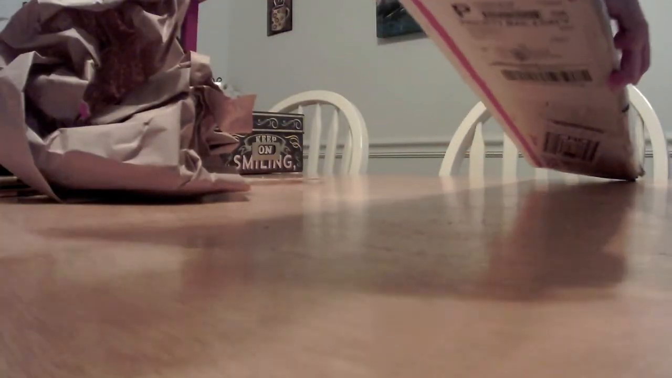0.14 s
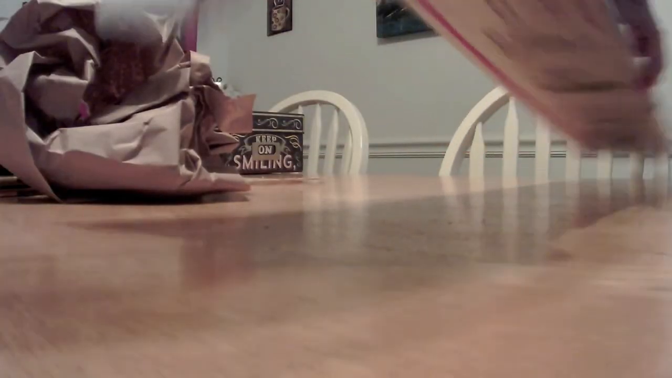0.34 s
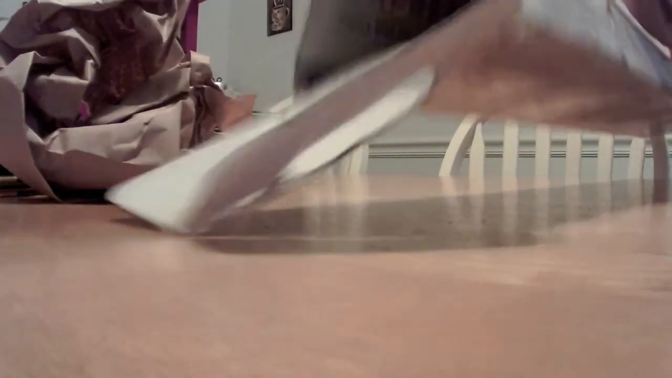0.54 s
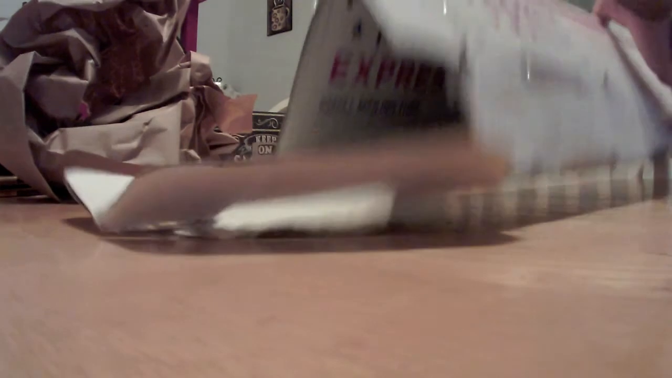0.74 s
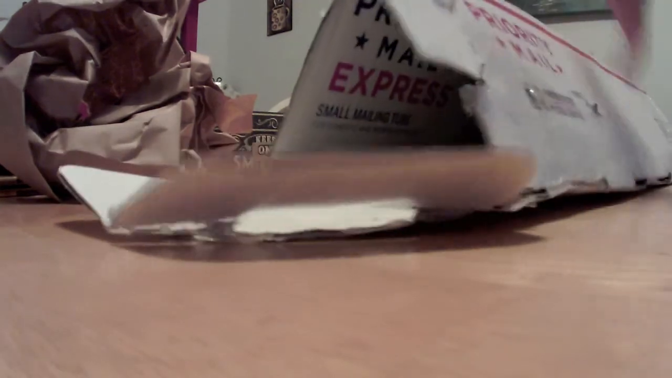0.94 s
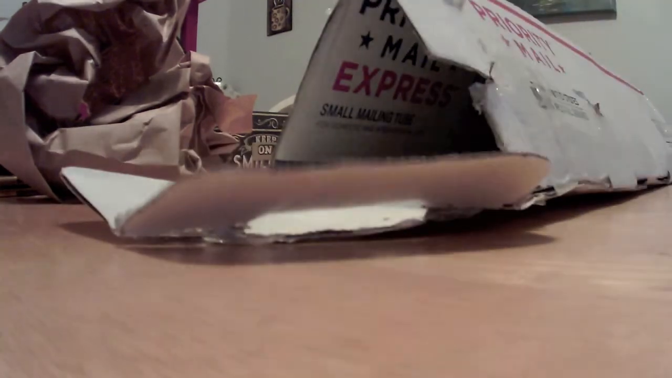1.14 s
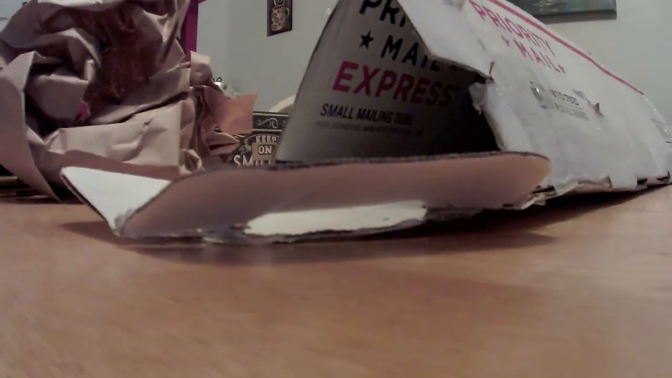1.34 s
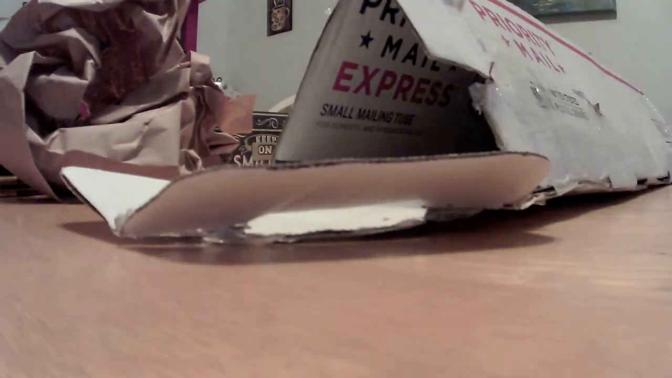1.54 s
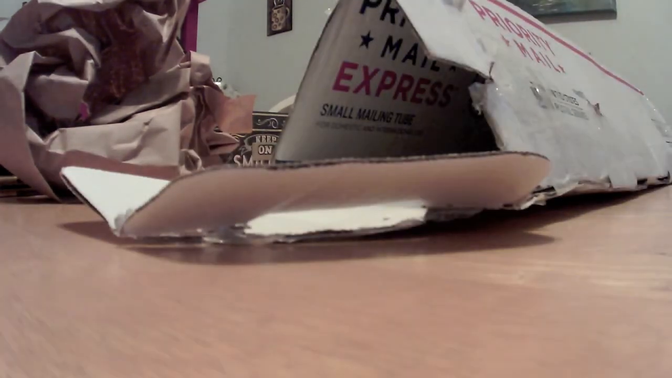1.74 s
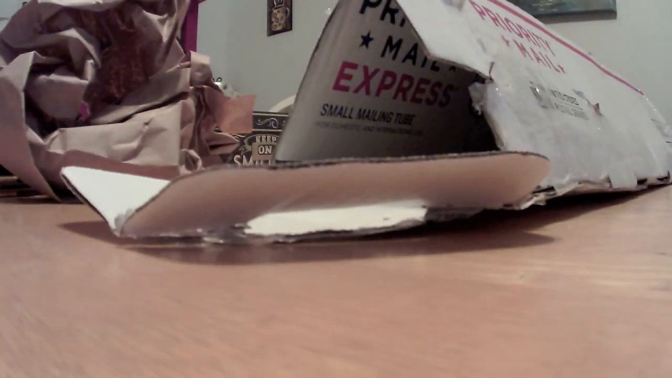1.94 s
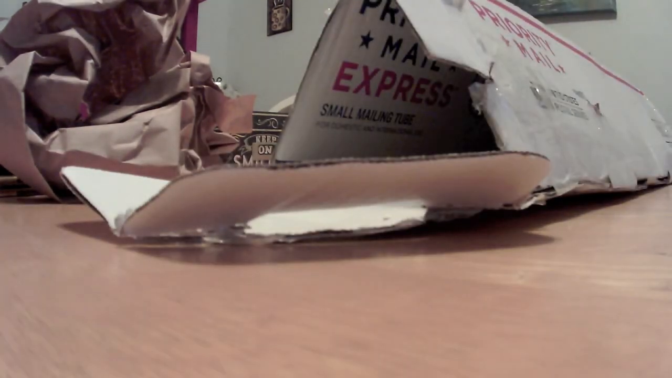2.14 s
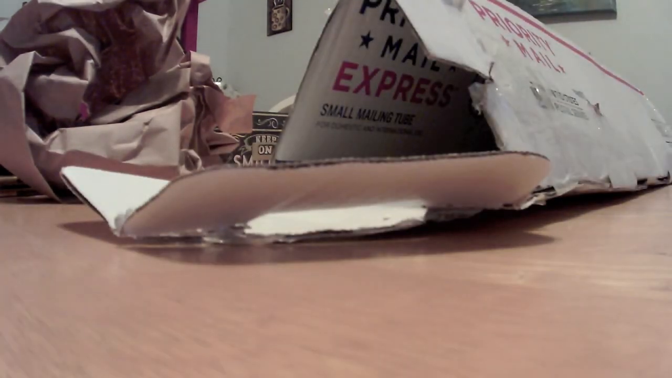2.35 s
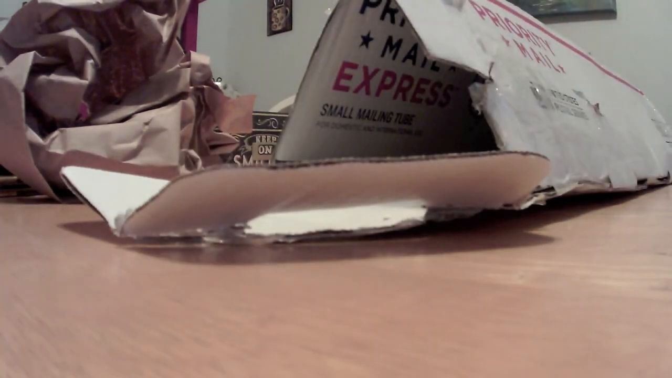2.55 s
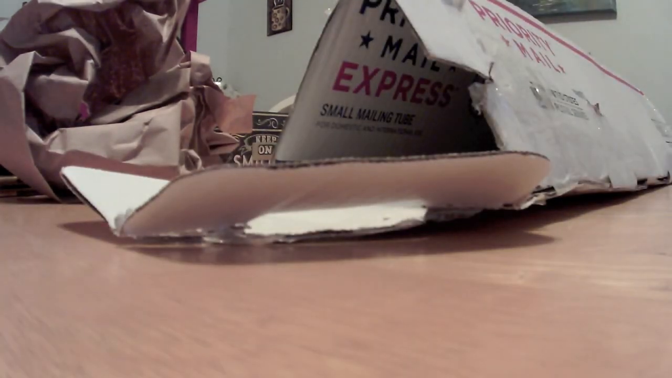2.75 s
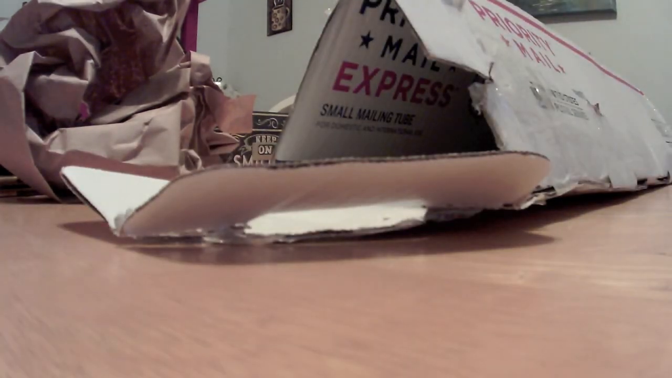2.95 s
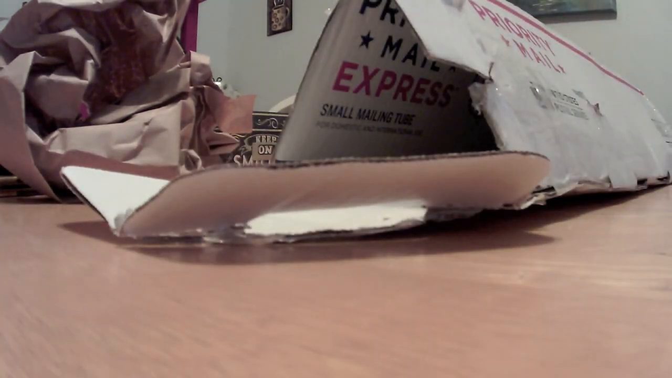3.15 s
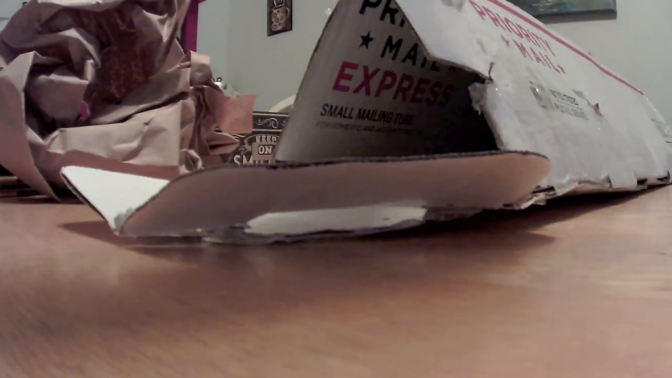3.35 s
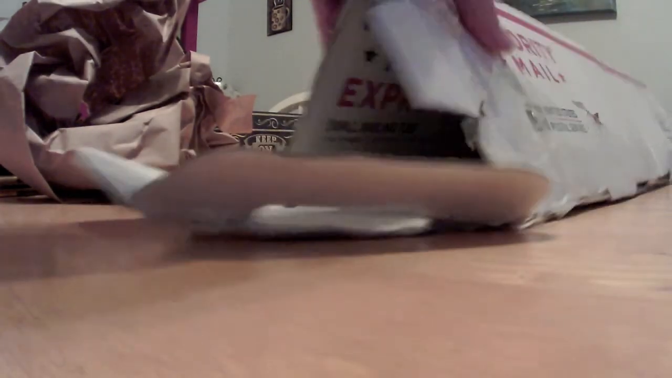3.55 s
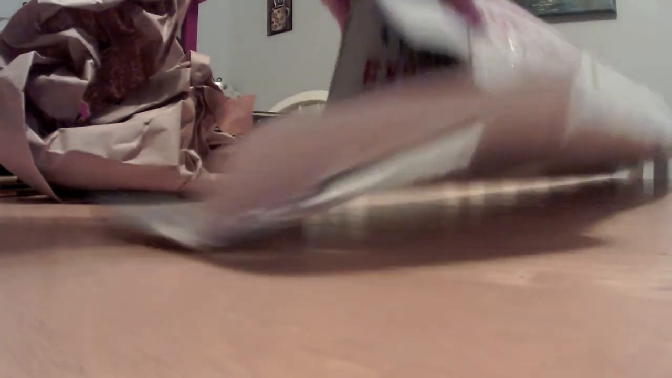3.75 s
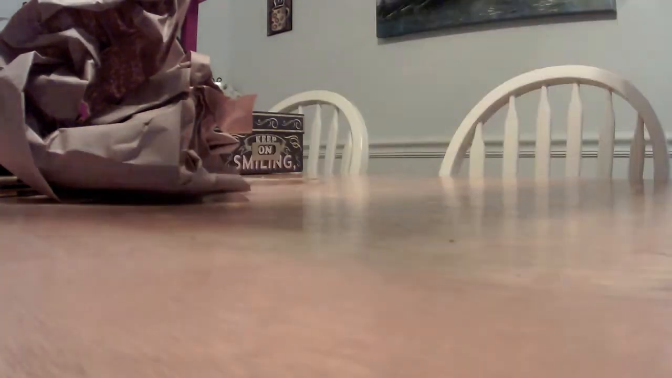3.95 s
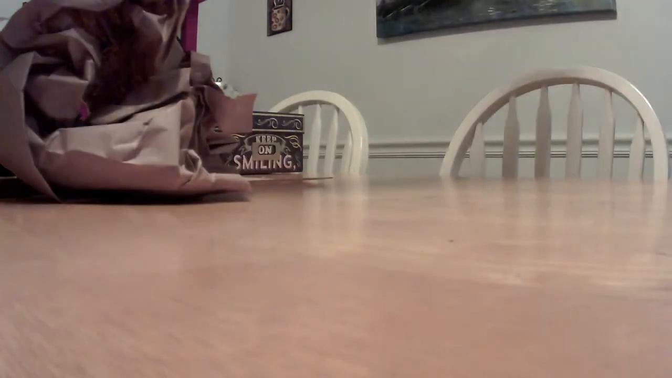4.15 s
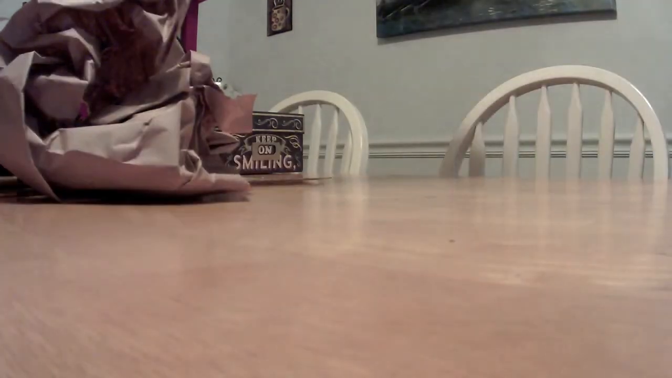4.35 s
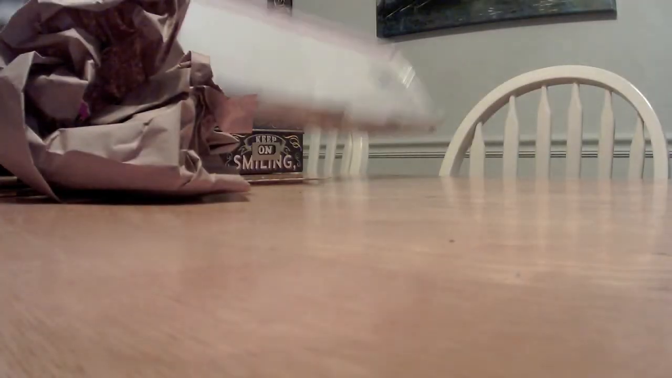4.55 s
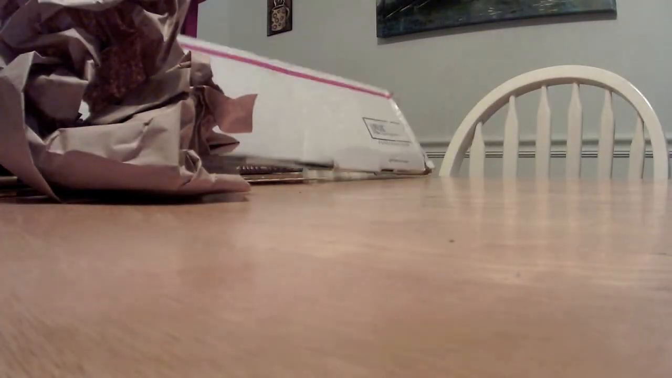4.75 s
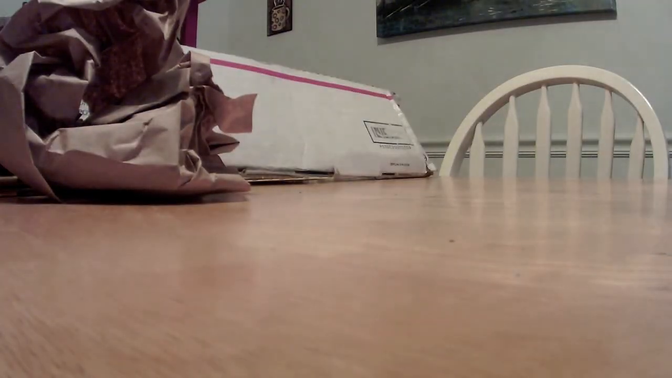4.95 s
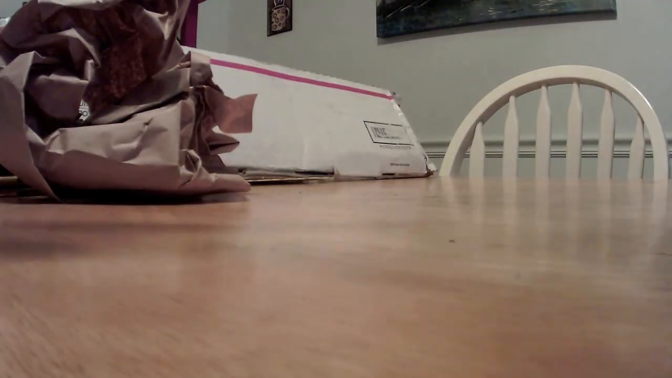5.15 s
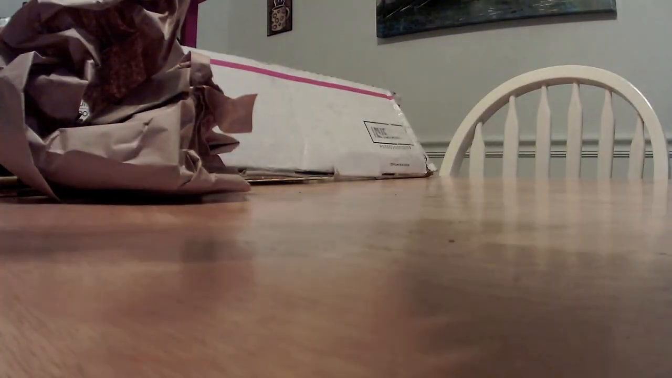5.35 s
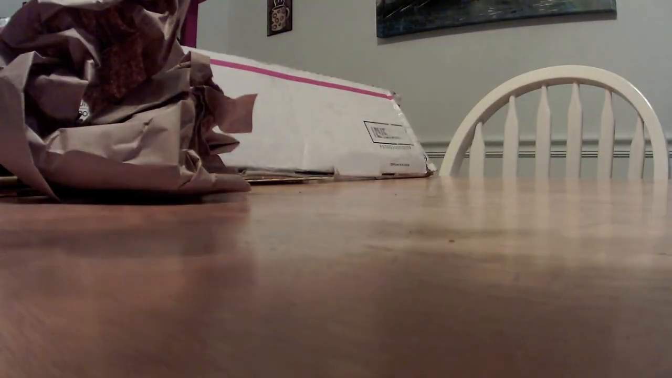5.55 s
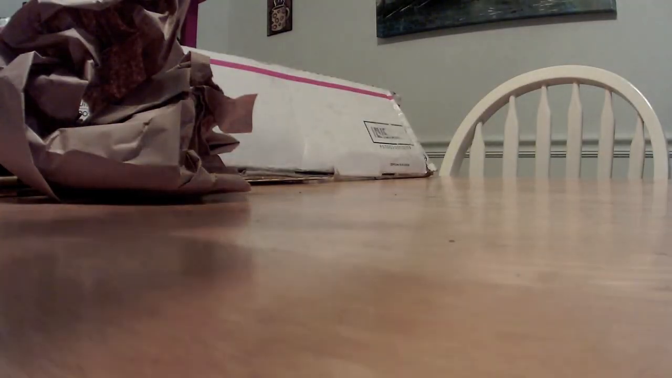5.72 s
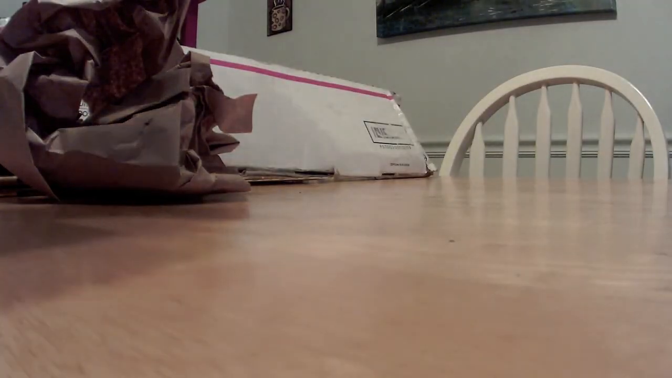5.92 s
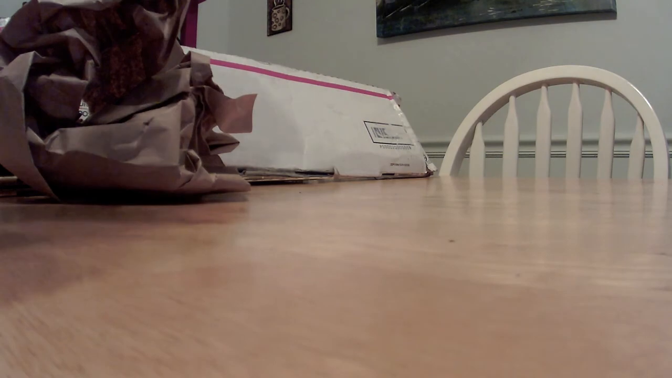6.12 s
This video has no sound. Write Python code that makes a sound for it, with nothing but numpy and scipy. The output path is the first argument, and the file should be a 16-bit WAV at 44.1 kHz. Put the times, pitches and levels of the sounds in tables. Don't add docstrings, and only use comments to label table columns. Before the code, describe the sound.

A small, narrow-band microphone lies on a wooden table in a quiet room with faint rumble and hiss. From 0 to 0.7 seconds, stiff paper crackles and snaps while a hollow cardboard box scrapes and ticks, strongest near 0.47. At about 0.95 the box lands with a loud hollow knock; its air rings on faintly and the table trembles low. From 1.5 to 2.1 paper crinkles in uneven swells, then again sharply around 2.5 to 2.7, with a deep table thump at 2.6. It is nearly quiet until 3.5, save tiny ticks. Between 3.65 and 3.95 the box is lifted with scrapes and hollow clacks. After another hush, it is set down from 4.75 to 4.95 with thuds and knocks. Paper crumples briskly from 5.4 to 5.8, fades, and one small high click comes near 6.2.

```python
import sys
import numpy as np
from scipy import signal
from scipy.fft import rfft, irfft, next_fast_len
from scipy.io import wavfile
from scipy.ndimage import uniform_filter1d, minimum_filter1d

SR = 44100
rng = np.random.default_rng(int(sys.argv[2]) if len(sys.argv) > 2 else 0)


def materialize(psi):
    bounded = np.clip(np.atleast_2d(psi).T, -1, 1)
    quanta = np.round(bounded * 32767).astype(np.int16)
    wavfile.write(sys.argv[1], SR, quanta)


def convert_level_to_amplitude(level_db):
    exponent = np.asarray(level_db, float) / 20
    return 10 ** exponent


N = 276948

# (frequency [Hz], density [dB per Hz])
PAPER_SPECTRUM = [(300, -26.5), (540, -28), (1270, -8), (2000, -5), (2900, -.5), (4300, -4), (6000, 2),
                  (7300, -1.5), (9200, 1.5), (12000, -0.5)]
# (peak time [s], crackle level [dB], rise [s per 20 dB], fall [s per 20 dB],
# treble over the crackle [dB])
SQUEEZES = [(0.068, -38.5, 0.4, 0.5, 3.5), (0.33, -42.5, -0.9, .5, 3), (0.472, -32.5, .1, 0.1, 5.5),
            (0.571, -42.5, -0.2, -0.12, 1), (1.445, -60, -0.3, 2, 0), (1.512, -44.5, 0.0652, 0.42, 3),
            (1.685, -48.5, 0.1, 0.2, 0.5), (1.842, -38, 0.2, 0.16, 2.5), (1.99, -48, 0, 0.18, 0.5),
            (2.05, -51, 1, -0.13, -0.5), (2.4, -60, 3, 0, -3.5), (2.497, -38, 0.06, 0.1348, 2),
            (2.576, -36.5, -0.2, 0.1242, 0.5), (2.7, -47, .03, 0.12, 0), (2.718, -41, 0, 0.0943, -4),
            (2.78, -61.5, -0.7, 0.5, -8), (3.073, -66.5, 0.1, 0.4, -3), (3.735, -43, 0.13, 0.04, -2.5),
            (5.0, -56.5, 0.12, 0.18, -2), (5.416, -43, 0.01, 0.15, 2), (5.458, -37, -0.1, 0.11, 3),
            (5.611, -36.5, 0.17, 0.2, 6), (5.665, -37, 0.13, 0.12, 3.5), (5.719, -36.5, 0.19, -0.0031, -3),
            (5.87, -56.5, -0.2, 0.1, 0), (5.81, -53, 0.8, 0.08, -3), (5.929, -53, 0.24, 0.08, -5.5)]
# (peak time [s], scrape level [dB], rise [s per 20 dB],
# fall [s per 20 dB], treble over its skin [dB])
SHOVES = [(0.22, -43.5, 5, 0.4, 10.5), (0.42, -42.5, .5, 0.29, 15.5), (0.476, -32.5, 0.06, 0.0352, -1),
          (0.57, -41.5, 0.2, 0.02, 6.5), (0.679, -41.5, -0.23, 0, 7), (0.62, -61, 1, -0.4, 7),
          (0.829, -50, 0.06, 0.5, 10), (0.918, -42, 0.03, 0.18, 6.5), (0.958, -34.5, 0.0536, 0.06, 5),
          (1.03, -50, -0.2, 0.23, 4.5), (1.658, -63.5, -1.5, 1, 1), (2.4, -64, 0.5, 1, 2),
          (2.47, -47.5, -0.06, 0.3, 3), (2.89, -58, .02, .15, 3), (3.07, -56.5, 0.1, 0.12, 3),
          (3.555, -58, .04, .1, 3), (3.671, -40, 0.02, 0.15, 7), (3.734, -45, 0.07, 0.13, 11.5),
          (3.79, -49.5, 0.16, 0.21, 11.5), (3.858, -40, 0.04, 0.1029, 9), (3.939, -42, 0.07, 0.1, 4),
          (3.98, -61, 0.3, .33, 10), (4.68, -63.5, 0.1, -3, -4), (4.751, -42.5, 0.0267, 0.1339, 7.5),
          (4.858, -41.5, 0.0235, 0.13, 11.5), (4.92, -45, 0.06, 0.13, 8), (4.995, -52, 0.09, 0.1, 13),
          (5.03, -56.5, 0.13, 0.09, -3), (6.18, -59.5, 0.1, 0.5, 12)]
REST_DB = -75
TICK_S = .0013


def evened(x):
    return x / np.sqrt(np.mean(x ** 2) + 1e-20)


def read(points, hz):
    f, value = np.transpose(points)
    return np.interp(np.log(hz + 1), np.log(f + 1), value)


def coloured(x, points):
    n = x.shape[-1]
    size = next_fast_len(n)
    gain = convert_level_to_amplitude(read(points, np.fft.rfftfreq(size, 1 / SR)))
    return irfft(rfft(x, size) * gain, size)[..., :n]


def add(mix, time_s, sound):
    part = mix[round(time_s * SR):][:len(sound)]
    part += sound[:len(part)]


def ring(hz, t60_s, seconds):
    t = np.arange(round(seconds * SR)) / SR
    return np.sin(2 * np.pi * hz * t) * convert_level_to_amplitude(-60 * t / max(t60_s, .002))


def resonate(x, hz, width_hz):
    return signal.lfilter(*signal.iirpeak(hz, hz / width_hz, SR), x)


def effort(rows, over_db=0):
    t, rows = np.arange(0, N + 64, 64) / SR, np.array(rows)
    peak_s, db, rise, fall = rows[:, :4].T[..., None]
    before = (peak_s - t) / np.maximum(rise, .005)
    after = (t - peak_s) / np.maximum(fall, .005)
    away = np.where(t < peak_s, before, after)
    power = (convert_level_to_amplitude(db + over_db - 20 * away) ** 2).sum(0)
    return np.interp(np.arange(N) / SR, t, power)


def quiet():
    # (frequency [Hz], density [dB per Hz])
    floor_spectrum = [(15, -10.5), (40, -6), (63, -3.5), (87, -13), (183, -15.5), (300, -19.5), (700, -24),
                      (1500, -30), (4000, -30.5), (9500, -29.5)]
    return convert_level_to_amplitude(-57.5) * evened(coloured(rng.standard_normal(N), floor_spectrum))


def grains(per_s, spread_db, clump_db, rub_db):
    size = convert_level_to_amplitude(spread_db * np.minimum(rng.exponential(1, N), 3.1)) * (rng.random(N) < per_s / SR)
    clumps = evened(uniform_filter1d(uniform_filter1d(rng.standard_normal(N), size=200), size=200))
    burst = uniform_filter1d(size, size=20) * rng.standard_normal(N)
    slips = evened(burst) + convert_level_to_amplitude(rub_db) * rng.standard_normal(N)
    return evened(slips * convert_level_to_amplitude(clump_db * clumps))


def crackle():
    skin_db = -6.5
    firm_db, skin_growth = -40.5, 0.22
    broad, thin = (coloured(grains(per_s=900, spread_db=3.2, clump_db=1.5, rub_db=-1.5), PAPER_SPECTRUM)
                   for _ in range(2))
    thin = thin + 0.38 * broad
    firm = (effort(SHOVES, -firm_db) + 1e-9) ** skin_growth
    squeeze_treble_db = np.array(SQUEEZES)[:, -1:]
    shove_treble_db = skin_db + np.array(SHOVES)[:, -1:]
    rest = convert_level_to_amplitude(REST_DB) ** 2
    body = effort(SQUEEZES) + firm * effort(SHOVES, skin_db) + rest
    bright = effort(SQUEEZES, squeeze_treble_db) + firm * effort(SHOVES, shove_treble_db) + rest
    split = signal.butter(3, 4800, fs=SR, output="sos")
    treble = convert_level_to_amplitude(2.0) * np.sqrt(bright) * evened(thin - signal.sosfiltfilt(split, thin))
    return np.sqrt(body) * evened(signal.sosfiltfilt(split, broad)) + treble


def patchy(x):
    patch_db = 2
    hz, t, z = signal.stft(x, SR, nperseg=256)
    field = rng.standard_normal((len(t), len(hz))).T
    for _ in range(2):
        field = uniform_filter1d(uniform_filter1d(field, size=5, axis=0), size=10, axis=1)
    gain = convert_level_to_amplitude(patch_db * evened(field) - patch_db ** 2 / 9)
    return signal.istft(z * gain, SR, nperseg=256)[1][:N]


def scrape():
    # (frequency [Hz], width [Hz], level [dB])
    air_modes = [(970, 730, -18), (1150, 520, 5), (1490, 210, 8), (1680, 290, 6), (2070, 540, -10.5)]
    x = grains(per_s=900, spread_db=3., clump_db=2., rub_db=4)
    box = sum(convert_level_to_amplitude(db) * resonate(x, hz, width_hz) for hz, width_hz, db in air_modes)
    paper_in_box_db = -19
    power = effort(SHOVES) + effort(SQUEEZES, paper_in_box_db) + convert_level_to_amplitude(REST_DB + 3.5) ** 2
    return convert_level_to_amplitude(-0.6) * np.sqrt(power) * evened(box)


def strays():
    per_s, level_db, spread_db = 45, 9, 3
    middle_db, top_db, colour_db = 1, -5, 5
    count = round(per_s * N / SR) - 1
    a, b, c, d, place = np.c_[rng.standard_normal((count, 4)), rng.random(count)].T
    time_s = .01 + (np.arange(count) + place) / per_s
    squeeze_db = 10 * np.log10(effort(SQUEEZES)[(time_s * SR).astype(int)] + 1e-12)
    db = squeeze_db + level_db + spread_db * np.minimum(a, 1)
    length_s = TICK_S * np.exp(.5 * d)
    return np.c_[time_s, db, middle_db + colour_db * b, top_db + colour_db * c, length_s]


def snaps():
    # (time [s], broad-fold energy [dB], middle over it [dB], top over it [dB], length [s])
    large_creases = [(0.2353, -9, 9, 7, 0.0013), (0.3173, -10, -2, -14, 0.00021),
                     (0.4502, -16, 12, 6, 0.001), (0.4695, -12, 6, 5, 0.003), (0.485, -11, 0, 4, 0.002),
                     (0.5698, -23.5, 12.5, 12, 0.0033), (0.5817, -22, 6, 7, 0.0035),
                     (0.6771, -22.5, 15, -5, 0.0032), (0.819, -31.5, 15, 9, 0.0025),
                     (0.9192, -23.5, 9.5, 11.5, 0.0037), (0.9492, -7.5, -6, -13, 0.013),
                     (1.0071, -19.5, 1, 7, 0.0018), (2.4629, -15, -12, -9, 0.0011),
                     (2.6916, -13.5, -5, 3, 0.0019), (3.6563, -17.5, -7, -5, 0.0029),
                     (3.6722, -12, -2, -11, 0.0019), (3.7281, -17, -15, 6.5, 0.002),
                     (3.8508, -14, 13, 6, 0.0004), (3.9314, -15.5, -14.5, -3, 0.0019),
                     (4.8546, -15, -6, -1, 0.0021), (4.9191, -20.5, 1.5, 8, 0.0052),
                     (5.4754, -9.5, -3, -7, 0.0025), (5.7926, -13.5, -1, -13, 0.0012),
                     (6.1963, -32.5, 15.5, 18, 0.0025)]
    # (time [s], broad-fold energy [dB], middle over it [dB], top over it [dB])
    ticks = [(0.2, -24, 7, 11.5), (0.441, -11, 3, -1), (0.492, -20, 11, 9), (1.3603, -27, -8, -30),
             (1.495, -14, -11, -8), (1.5439, -16, 0, 1.5), (1.5772, -15, 3.5, -9), (1.688, -21, -0.5, 6),
             (1.9975, -17.5, -11, -3), (2.139, -26, 5, 0), (2.182, -22.5, 4.5, 5), (2.2213, -23, -2, 1),
             (2.246, -20, -11, -11), (2.3672, -23.5, -10, -20), (2.403, -22.5, -9.5, -15),
             (2.565, -17, 8, -5.5), (2.591, -17.5, -3.5, 3), (2.8819, -20, 0, -14.5),
             (3.0614, -26.5, 5.5, 0.5), (3.5497, -26, -1, -18.5), (4.123, -29, -2, -6),
             (4.5289, -37, 5, -13), (4.5877, -35, 3, 7), (4.742, -25.5, -5, 4), (4.8948, -29.5, 14.5, 18.5),
             (4.986, -27, 10, 1), (5.307, -29.5, -7, -15), (5.4161, -30, -2, -10),
             (5.5522, -10.5, -3.5, -15), (5.602, -12.5, 4, 7)]
    # (time [s], broad-fold energy [dB], middle over it [dB])
    nicks = [(0.177, -29, 13), (0.4385, -28, 18), (1.471, -24.5, -5), (1.5076, -14, -3), (1.522, -25, 2),
             (1.557, -16, 0), (1.5685, -16.5, 7.5), (1.5912, -26, 10.5), (1.723, -24, -3), (1.753, -20, 1),
             (1.798, -20, 2), (1.819, -19.5, 5.5), (1.8374, -29, 12), (1.869, -28, 5), (1.9546, -29.5, 10),
             (1.983, -29, 11.5), (2.026, -24, -2), (2.5695, -11, -2), (2.7205, -18, -6), (2.791, -29, -1),
             (3.0408, -30, -15), (3.5321, -30, -21.5), (4.946, -23.5, 3.5), (5.4486, -18.5, 2),
             (5.4542, -21, 4), (5.6427, -17, -9), (5.7678, -24, 5), (5.8032, -33, 0), (5.8404, -33, 3.5),
             (5.865, -22, -6),
             (0.0071, -23, -1), (0.029, -19, -9), (0.047, -15, -3), (0.0623, -12, -13), (0.068, -16, -6),
                (0.0766, -18, -6), (0.095, -27, 3), (0.1283, -28, 8), (0.1353, -31, 11), (0.1411, -23, -4),
                (0.1949, -18, -3), (0.227, -24, 4), (0.2604, -24, 0), (0.3513, -17, -5), (0.3907, -28, 12),
                (0.3962, -24.5, 11.5), (0.4344, -27, 7), (0.4537, -19, 17), (0.5293, -21, -4.5),
                (0.539, -18, -5), (0.558, -19, -6), (0.5721, -20, 1), (0.6807, -32, 5), (0.8327, -25, -8),
                (0.9344, -22, -10), (1.0198, -19, -18), (1.1094, -26, -24), (1.1546, -29.5, -26),
                (1.4419, -39, 6), (1.5262, -23, 3), (1.599, -21, 0.5), (1.6417, -27.5, 9.5),
                (1.6695, -26, 2), (1.6784, -23, -4.5), (1.7054, -30, 3), (1.738, -27, 1),
                (1.7623, -32, 12.5), (1.7753, -24, 5), (1.7885, -19, -6), (1.8514, -23, 6),
                (1.8665, -21, -1), (1.8822, -22, -6), (1.9184, -27, 6.5), (1.971, -32, 9),
                (1.9801, -23, -2), (2.0008, -20, -5), (2.004, -23.5, -4), (2.042, -26, -15),
                (2.0641, -26, -4), (2.113, -32, -9), (2.115, -35, -2), (2.1681, -27, -9), (2.206, -28.5, 0),
                (2.2326, -30, -5.5), (2.321, -34, -3), (2.3365, -29.5, -11), (2.413, -30, -2),
                (2.483, -21, -15),
             (2.488, -16.5, -2.5), (2.4998, -18, -7), (2.509, -33, 5), (2.5485, -23, 5),
                     (2.552, -25, 3), (2.5777, -15, -18), (2.5848, -21, 2), (2.6072, -25, -13),
                     (2.6132, -27, -5), (2.6476, -38, 7), (2.6549, -29, -5), (2.677, -29, 7),
                     (2.701, -28.5, 11.5), (2.759, -26, 0), (2.959, -36.5, -0.5), (3.3802, -37, -10),
                     (3.668, -34, 18), (3.6767, -20, -13), (3.691, -27, 2), (3.7365, -22, 6),
                     (3.741, -23, 2), (3.855, -23, 7), (3.8585, -15.5, -8), (3.9105, -31, 4),
                     (3.935, -15, -23), (4.7264, -34, -2), (4.7505, -23.5, -13), (4.7646, -22, -23),
                     (4.8416, -34, 14.5), (4.8738, -27, 4), (4.9962, -44, 14), (5.0926, -32, -4),
                     (5.3972, -32.5, -2), (5.4212, -27, -6), (5.4328, -20, -5), (5.4986, -24, -7),
                     (5.5083, -23, 2), (5.543, -27, 2), (5.56, -21, -1), (5.573, -23, 9), (5.584, -18, -1),
                     (5.5898, -17, -3), (5.6177, -16, -8), (5.626, -19, -6), (5.65, -20, 2),
                     (5.6538, -15, -2), (5.669, -21, 1), (5.674, -18, 8), (5.692, -21, 7), (5.712, -17, -1),
                     (5.7156, -16.5, -2), (5.7497, -24, -6), (5.7773, -26, 5), (5.858, -25, -7),
                     (5.8744, -30, -16), (5.8938, -29, -9), (5.9004, -33, 5), (5.9106, -36, 7)]
    # (low edge [Hz], high edge [Hz])
    fold_bands = [(1700, 4300), (4300, 7900), (7900, 11000)]
    nick_top_db, nick_s = -4, .0015
    creases = [*large_creases, *[(*tick, TICK_S) for tick in ticks], *strays()]
    for time_s, db, middle_db in nicks:
        creases.append((time_s, db, middle_db, middle_db + nick_top_db, nick_s))
    out, t = np.zeros(N), (np.arange(800) - 300) / SR
    noise = coloured(rng.standard_normal((600, 800)), PAPER_SPECTRUM)
    bands = [signal.sosfiltfilt(signal.butter(2, hz, "band", fs=SR, output="sos"), noise)
             for hz in fold_bands]
    for k, (time_s, db, middle_db, top_db, length_s) in enumerate(creases):
        span = max(length_s, .0003) * np.where(t < 0, .5, .7)
        for band, over_db, slow in zip(bands, (0, middle_db, top_db), (1.5, 1, .85)):
            burst = band[k] * np.exp(-abs(t / span / slow) ** 1.3)
            add(out, time_s + t[0], convert_level_to_amplitude(db + over_db) * burst / np.linalg.norm(burst))
    return out


def taps():
    # (time [s], level [dB], ring frequency [Hz])
    wall_taps = [(0.1993, -31.5, 1320), (0.235, -32, 754), (0.234, -23, 1980), (0.4696, -21, 1430),
                 (0.56, -30, 1510), (0.833, -34.5, 1820), (0.9479, -13.5, 1555), (0.9568, -14, 1436),
                 (0.975, -42, 905), (0.98, -41, 410), (0.968, -40, 325), (1.122, -48, 200),
                 (1.018, -28.5, 1580), (1.1112, -39, 1650.0), (1.156, -39, 1580.0), (1.5066, -34, 1720.0),
                 (3.062, -43, 1420), (3.5487, -41, 1680.0), (3.656, -29.5, 1460), (3.6743, -22, 1590),
                 (3.728, -24, 1700), (3.859, -25, 1470), (3.933, -13, 1610), (4.5873, -40, 1460),
                 (4.763, -26.5, 1830), (4.853, -21.5, 1253), (4.861, -28, 1440), (4.921, -26.5, 1590),
                 (4.9438, -30, 1750), (4.864, -49, 395), (4.856, -45, 505), (4.868, -42, 200),
                 (4.764, -41, 203), (4.765, -50, 390), (4.93, -46, 195), (3.078, -46, 1450),
                 (3.092, -49, 1500), (2.886, -46, 2100), (4.6, -50, 1500), (5.096, -43, 1370),
                 (4.685, -47.5, 1300), (4.7495, -27, 1800), (5.051, -49, 1110), (1.134, -43, 1270),
                 (1.36, -45, 1510), (3.685, -36, 900), (0.08, -29, 1500), (0.934, -34, 980),
                 (4.205, -53, 1050), (6.196, -25.5, 3330)]
    out = np.zeros(N)
    for time_s, db, hz in wall_taps:
        t60_s, build_s = 18.1 / hz, 1.8 / hz
        wall = ring(hz, t60_s, .1)
        wall = wall + 0.27 * ring(1.139 * hz, 1.4 * t60_s, .1)
        wall = wall + 0.34 * ring(0.689 * hz, 1.02 * t60_s, .1)
        build = np.minimum(np.arange(len(wall)) / SR / build_s, 1)
        add(out, time_s - build_s, convert_level_to_amplitude(db + 4.) * wall * build)
    return out


def table():
    # (time [s], peak level [dB], deep mode over the rest [dB], contact time [s])
    blows = [(0.232, -49.5, -24, 0.0011), (0.558, -46, 14, 0.0043), (0.917, -39, -13, 0.0011),
             (0.952, -27, -7, 0.00089), (1.002, -60.5, -3, 0.0016), (1.042, -46, 10, 0.005),
             (1.18, -52, 12, 0.006), (2.619, -23, -1.5, 0.0055), (3.673, -33.5, -2, 0.0038),
             (3.702, -41.5, -16, 0.0022), (3.858, -22, -4, 0.001), (4.747, -27.5, -4, 0.0047),
             (4.797, -27, -20.5, 0.0066), (4.85, -36, 6, 0.0045), (4.957, -42, 15, 0.005),
             (5.0, -42, -12, 0.004)]
    # (frequency [Hz], level [dB], t60 [s])
    top_modes = [(61.54, -1, 0.52), (123.8, -11, 0.36), (191.2, 2, 0.18), (228, -5.5, 0.2),
                 (311.5, -4.5, 0.13), (390, -11, 0.13)]
    # (peak time [s], level [dB], rise [s per 20 dB], fall [s per 20 dB])
    leans = [(0.57, -53, 1.5, 0.2), (0.99, -45.5, -0.34, .5), (1.09, -44, 0.3, -0.67),
             (1.22, -51.5, -0.9, -0.5), (3.69, -50, 0, .3), (3.92, -52, 0.1, 0.4), (4.8, -48, 0.03, 0.77),
             (4.97, -44, 0.1, 0.28), (5.07, -54, 0.2, 0.2)]
    still_db = -74
    out, t = np.zeros(N), np.arange(round(.6 * SR)) / SR
    for time_s, db, deep_db, contact_s in blows:
        modes = np.zeros(len(t))
        for k, (hz, mode_db, t60_s) in enumerate(top_modes):
            gain = (-1) ** k * convert_level_to_amplitude(mode_db + deep_db * (hz < 90))
            modes += gain * ring(hz, t60_s, .6) * np.minimum(t * hz / 0.64, 1)
        push = np.hanning(max(round(contact_s * SR), 4))
        add(out, time_s - .006, convert_level_to_amplitude(db - 7.5) * np.convolve(modes, push / push.sum()))
    shake = rng.standard_normal(N)
    tremble = resonate(resonate(shake, 61.9, 8.0), 59.6, 40)
    tremble = tremble + .5 * resonate(resonate(shake, 44, 22), 44, 30)
    return out + np.sqrt(effort(leans) + convert_level_to_amplitude(still_db) ** 2) * evened(tremble)


def linger():
    # (frequency [Hz], level [dB])
    narrow_modes = [(1465, -5), (1545, 0), (1628, -0.5), (1728, 0.5)]
    # (peak time [s], level [dB], rise [s per 20 dB], fall [s per 20 dB])
    landings = [
        (0.97, -53.5, 0.3, 0.54),
        (3.94, -57.5, 0.08, 0.22),
        (4.86, -62, 0.1, 0.13),
    ]
    air = rng.standard_normal((len(narrow_modes), N))
    song = sum(convert_level_to_amplitude(db) * evened(resonate(a, hz, width_hz=10)) for a, (hz, db) in zip(air, narrow_modes))
    return np.sqrt(effort(landings)) * evened(song)


def room(x):
    # (frequency [Hz], t60 [s])
    decay = [(300, 0.14), (1500, 0.11), (4000, 0.14), (9000, 0.093)]
    echoes = np.zeros(SR // 2)
    at = np.arange(200, len(echoes) - 20, 20)
    echoes[at + rng.integers(0, 20, len(at))] = rng.choice([-1., 1.], len(at))
    hz, t, z = signal.stft(echoes, SR, nperseg=256)
    tail = signal.istft(z * convert_level_to_amplitude(-60 * t / read(decay, hz)[:, None]), SR, nperseg=256)[1]
    return signal.oaconvolve(x, tail / np.linalg.norm(tail))[:N]


def scene():
    paper, box, rustle = snaps(), taps(), patchy(crackle()) + scrape()
    sent = convert_level_to_amplitude(-10.5) * paper + convert_level_to_amplitude(-10) * box + convert_level_to_amplitude(-13) * rustle
    return (paper + box + rustle + room(sent) + linger() + table() + quiet())[None]


def odds_near_cracks(z):
    treble_db = 10 * np.log10((abs(z) ** 2).mean(0) + 1e-14)
    top_db = -minimum_filter1d(-treble_db, size=21)
    sudden_db = top_db - uniform_filter1d(treble_db, size=21)
    sudden = np.clip((sudden_db - 6.5) / 3, 0, 1)
    hushed = np.clip((top_db - treble_db - 4) / 4, 0, 1)
    return .42 * sudden * hushed


def punched(x, size, cell, odds_of):
    overlap = size * 3 // 4
    hz, t, z = signal.stft(x, SR, nperseg=size, noverlap=overlap)
    luck = rng.random((len(hz) // cell[0] + 1, len(t) // cell[1] + 1))
    luck = np.kron(luck, np.ones(cell))[:len(hz), :len(t)]
    dropped = (luck < odds_of(z[hz > 2000])) & (hz[:, None] > 2400)
    return signal.istft(z * np.where(dropped, .04, 1), SR, nperseg=size, noverlap=overlap)[1][:N]


def gappy(x):
    x = punched(x, size=1024, cell=(4, 6), odds_of=lambda z: .06)
    return punched(x, size=256, cell=(5, 4), odds_of=odds_near_cracks)


def band_limit(x):
    return signal.sosfilt(signal.butter(12, 10950, fs=SR, output="sos"), x)


def record(dry):
    # (frequency [Hz], level [dB])
    response = [(7300, 0.5), (7600, -7.5), (7800, -28), (8000, -37), (8200, -7.5), (8450, 0.5), (9550, 1.5),
                (9850, -34), (10800, -51), (14000, -85)]
    mix = coloured(gappy(dry[0]), response)[None]
    return band_limit(mix)


dry = scene()
out = record(dry)
materialize(out)
```